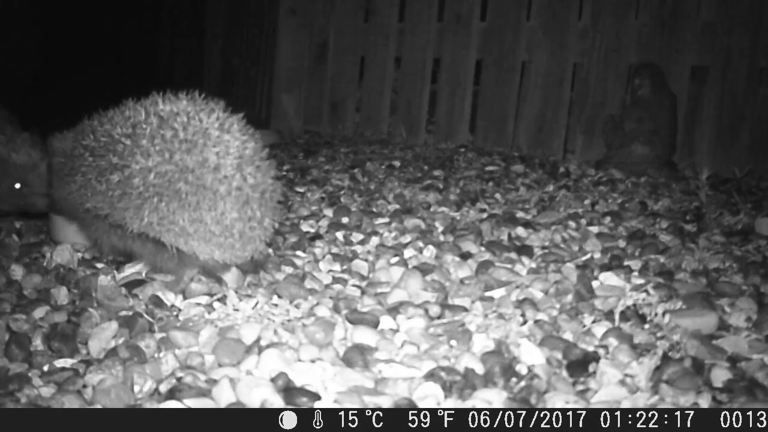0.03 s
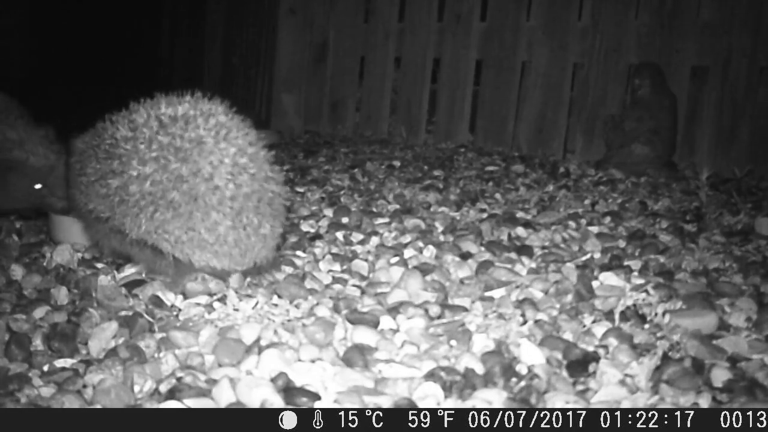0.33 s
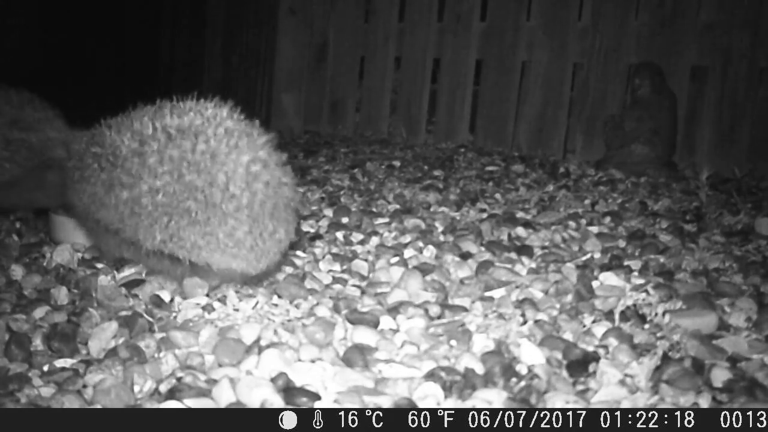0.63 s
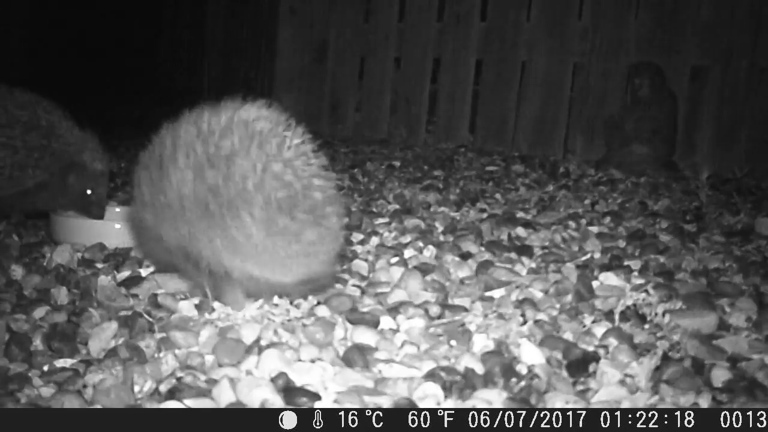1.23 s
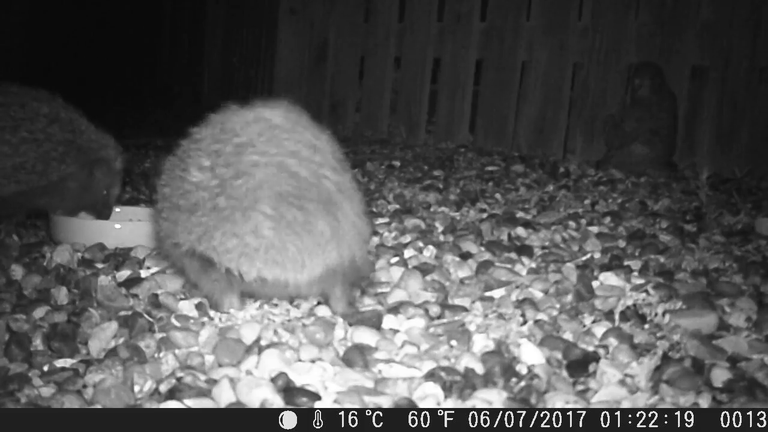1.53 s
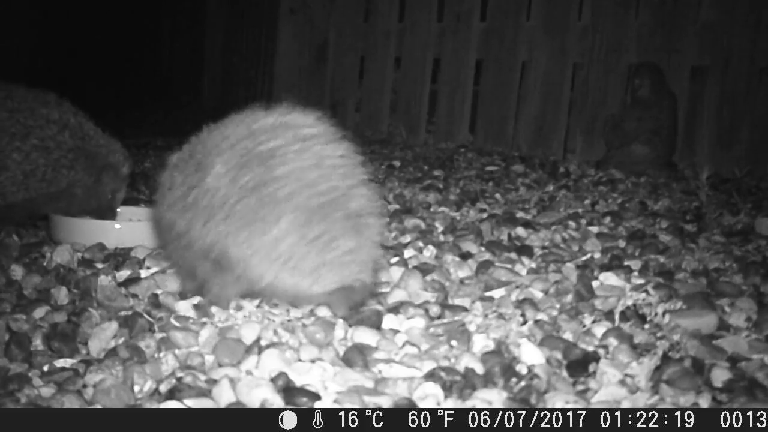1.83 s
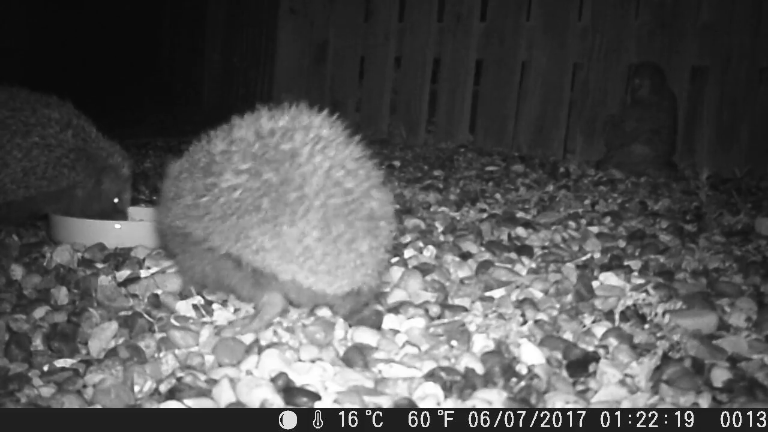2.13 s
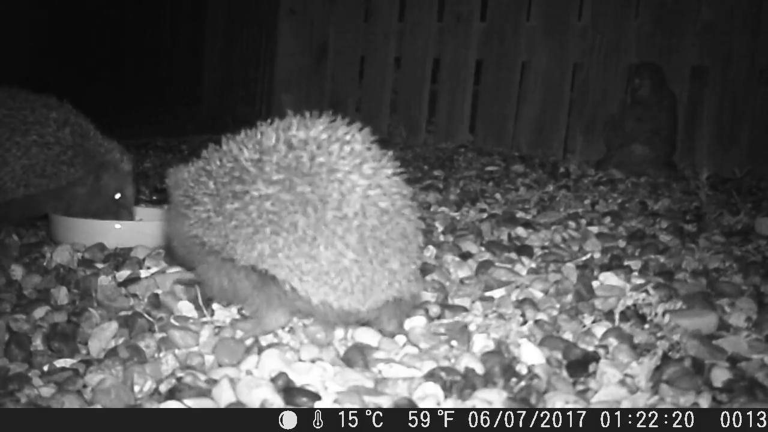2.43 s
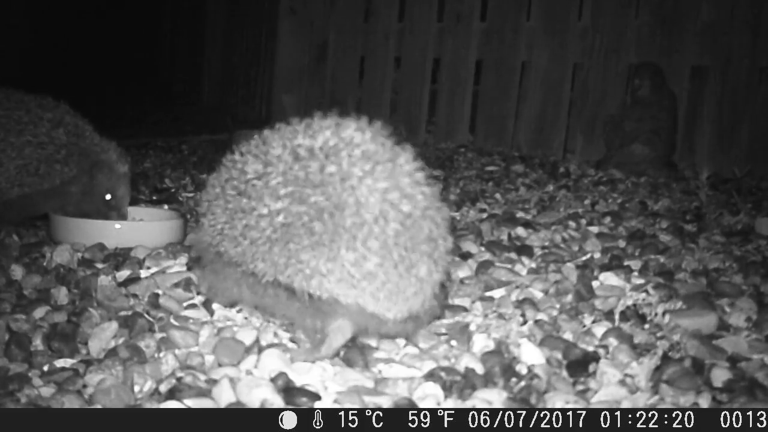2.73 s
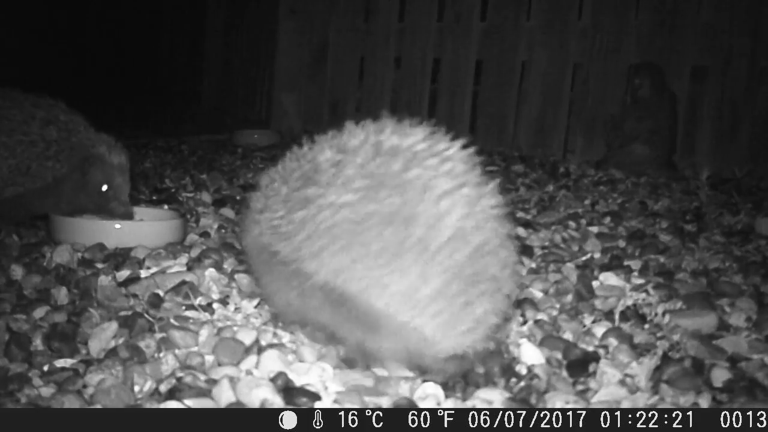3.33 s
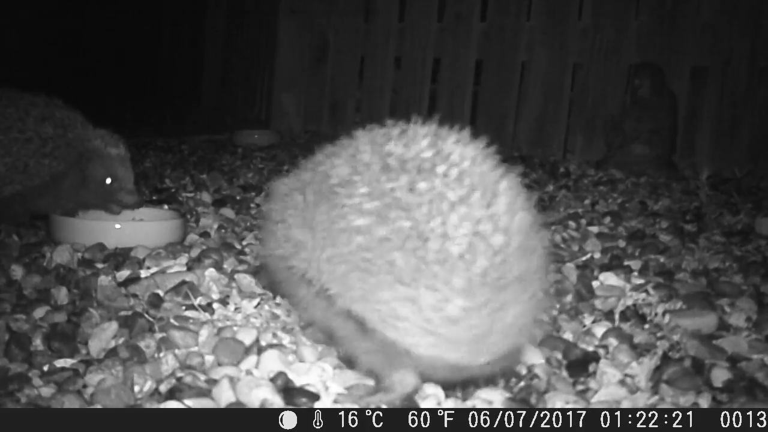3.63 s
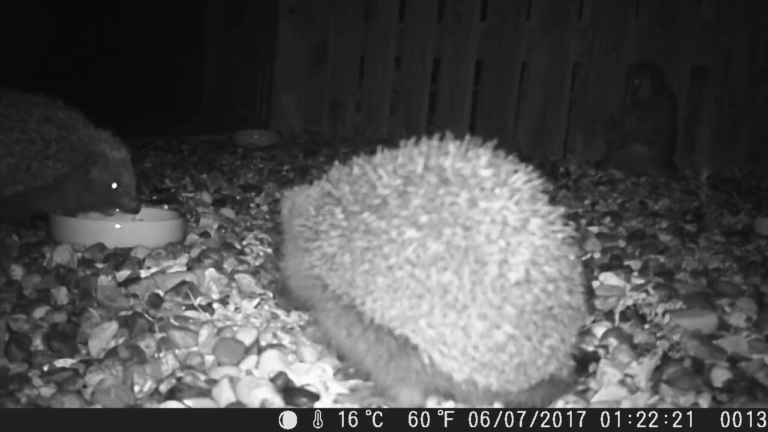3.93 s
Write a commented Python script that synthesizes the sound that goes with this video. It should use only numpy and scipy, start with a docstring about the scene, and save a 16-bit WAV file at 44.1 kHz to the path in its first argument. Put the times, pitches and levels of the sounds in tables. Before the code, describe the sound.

Close to the microphone in a yard at night, a hedgehog puffs air through its snout in a steady, quick rhythm. Soft footsteps, gravel scrapes and small pebble clicks come and go throughout, over a low rumble and faint hiss.

```python
"""A hedgehog huffs about three times a second, shuffling round on the gravel of a yard at night.
It is close to a small outdoor microphone. Each huff is a jet of air through the snout: a hollow rush
with a nasal hiss. Its feet thud softly, drag through the gravel and knock pebbles together.
Ground and fence give faint reflections, and a low night rumble lies behind it all."""
import sys
import numpy as np
from scipy import signal
from scipy.fft import rfft, irfft
from scipy.io import wavfile

SR = 44100
rng = np.random.default_rng(int(sys.argv[2]) if len(sys.argv) > 2 else 0)


def inscribe(sig):
    """Save sig as 16-bit PCM at rate SR to the path in sys.argv[1].

    A 1-D sig is mono; a 2-D sig holds one channel per row.
    Samples are clipped to [-1, 1] before scaling.
    """
    pcm = np.round(np.clip(np.atleast_2d(sig).T, -1, 1) * 32767)
    wavfile.write(sys.argv[1], SR, pcm.astype(np.int16))


N = 176400

# spectrum of gravel, stone on stone: frequency_hz, relative_db
GRAVEL_SPECTRUM = [(500, -28.5), (1100, -10), (1400, -6), (1800, -4.5), (2700, 0), (4000, 0), (5800, 1),
                   (7400, 7.5), (8200, -0.5), (9000, -24)]
# resonances of the stones: centre_hz, width_hz, lift_db
STONE_RESONANCES = [(1420, 210, 4), (2720, 400, 3), (5060, 410, 1), (7400, 630, 4)]
STONE_SPREAD, TREBLE_LIMIT_HZ = 0.14, 8750


def huff(length_s, release_s, rush_db, hiss_db, tilt_db, nostril_hz, dip_hz):
    """A fluttering jet of air swells and dies away in the resonances of the snout."""
    # spectrum of the hollow rush: frequency_hz, relative_db
    rush_spectrum = [(100, -20), (220, -9), (330, 1.5), (450, -1.5), (560, -2), (640, 0.5), (1000, -1),
                     (1130, -6), (1330, -7), (1550, -13.5), (2100, -20.5), (3000, -31), (6000, -44.5)]
    # spectrum of the nasal hiss: frequency_hz, relative_db
    hiss_spectrum = [(1200, -12), (2400, -7.5), (3000, 2.5), (4000, 0), (4700, -5), (5700, -3),
                     (6400, -6.5), (7300, -1), (8000, -5.5), (8800, -21)]
    # resonances of the snout: centre_hz, width_hz, lift_db
    snout_resonances = [(969, 92, 5), (3020, 160, 2.5), (3560, 310, 1), (5570, 400, 2.5), (7200, 1200, 3)]
    rush_rise_s, hiss_rise_s, sag_octaves_per_s = 0.011, 0.012, 1.8
    swell_db, crest_fraction, flutter_db = 7, 0.63, 1.5
    t = np.arange(2 ** 14) / SR
    snout = detuned(snout_resonances, spread=0.025)
    rush = colour(rng.standard_normal(len(t)), rush_spectrum, peaks=snout)
    hiss = colour(rng.standard_normal(len(t)), hiss_spectrum, tilt_db, snout)
    # the nostril resonance and a hollow dip from the ground echo sink as the huff runs out
    sag = 2 ** (-sag_octaves_per_s * np.minimum(t, length_s + release_s))
    hiss = hiss + amp(-0.5) * resonate(hiss, nostril_hz * sag, width_hz=450)
    hiss = unit(hiss - 0.47 * resonate(hiss, dip_hz * sag, width_hz=1100))
    flow = np.exp(-(np.maximum(t - length_s, 0) / release_s) ** 1.34)
    push_db = -swell_db * (np.minimum(t / length_s, 1) / crest_fraction - 1) ** 2
    flutter = amp(flutter_db * band(len(t), 0, width_hz=242))
    rush *= np.minimum(t / rush_rise_s, 1) * amp(rush_db + push_db)
    hiss *= np.minimum(t / hiss_rise_s, 1) * amp(hiss_db + 0.79 * push_db)  # the hiss swells less
    return flow * flutter * (rush + hiss)


def footfall(length_s, level_db):
    """A foot presses dully and unevenly into the gravel bed."""
    # spectrum of the thud: frequency_hz, relative_db
    thud_spectrum = [(100, -8.5), (220, -1), (330, 7), (550, -4.5), (900, -5), (1300, -12.5), (1900, -26.5),
                     (4000, -40.5)]
    attack_s, lumps_db = 0.0041, 2
    t = np.arange(2 ** 12) / SR
    weight = np.minimum(t / attack_s, 1) * np.exp(-2 * (t / length_s) ** 3)
    lumps = unit(amp(lumps_db * band(len(t), 0, width_hz=160)))
    return amp(level_db) * weight * lumps * colour(rng.standard_normal(len(t)), thud_spectrum)


def scuff(length_s, level_db, tilt_db):
    """A dragged foot sets off many tiny slips of stone on stone over a fine grinding."""
    size, slips_per_s, slip_spread_db = 2 ** 13, 830, 4
    t = np.arange(size) / SR
    slips = rng.standard_normal(size) * amp(slip_spread_db * np.minimum(rng.exponential(1, size), 3))
    slips *= rng.random(size) < slips_per_s / SR
    grinding = 0.64 * rng.standard_normal(size)
    stones = detuned(STONE_RESONANCES, STONE_SPREAD)
    grit = colour(unit(slips) + grinding, GRAVEL_SPECTRUM, tilt_db, stones)
    drag = abs(np.sin(np.pi * np.minimum(t / length_s, 1) ** 0.67))  # a rounded stroke, peaking early
    return amp(level_db) * drag * grit


def pebble_knock(level_db, tilt_db):
    """A pebble ticks, rings for an instant and settles."""
    size, lead = 2 ** 11, 2 ** 6
    ring_t60_s, settle_t60_s, settle_db = 0.0068, 0.009, -22.5
    t = np.arange(size) / SR
    decay = amp(-60 * t / ring_t60_s) + amp(settle_db - 60 * t / settle_t60_s)
    lowpass = signal.butter(8, TREBLE_LIMIT_HZ, fs=SR, output="sos")
    ring = signal.sosfilt(lowpass, rng.standard_normal(size) * decay)
    stones = detuned(STONE_RESONANCES, STONE_SPREAD)
    tick = colour(np.roll(ring, lead), GRAVEL_SPECTRUM, tilt_db, stones)[lead:]
    return amp(level_db) * tick * np.sqrt(0.001 * SR / size)  # level as if all its energy fell in 1 ms


def yard_reflections(sound):
    """Faint, short reflections from the ground and the fence."""
    level_db, t60_s, delay_s = -13, 0.13, 0.003
    t = np.arange(SR // 3) / SR
    echoes = rng.standard_normal(len(t)) * (rng.random(len(t)) < 0.05)
    tail = echoes * amp(-60 * t / t60_s) * (t > delay_s)
    return amp(level_db) * signal.fftconvolve(sound, tail / np.linalg.norm(tail))[:N]


def night_rumble():
    """Low rumble thinning into faint hiss, easing slightly, with a wavering hum."""
    # spectrum of the night air: frequency_hz, relative_db
    rumble_spectrum = [(8, -24), (22, 1.5), (38, 0), (50, -5), (90, -11), (130, -9.5), (180, -15.5),
                       (240, -16.5), (400, -19), (500, -22.5), (750, -25.5), (1000, -32), (1500, -37),
                       (2200, -41), (3600, -46), (5200, -54), (7100, -45), (8500, -60)]
    # slow drift of the rumble: time_s, level_db
    rumble_levels = [(0, -52), (1.3, -52), (2.3, -53), (2.8, -53.5), (4, -52.5)]
    # narrow bands of hum: pitch_hz, width_hz, level_db
    hum_bands = [(75.16, 4.5, -63.5), (103.3, 11, -67)]
    hum = sum(amp(level_db) * band(N, hz, width_hz) for hz, width_hz, level_db in hum_bands)
    level = amp(np.interp(np.arange(N) / SR, *np.transpose(rumble_levels)))
    return level * colour(rng.standard_normal(N), rumble_spectrum) + hum


def amp(db):
    """Decibels to gain."""
    return 10 ** (np.asarray(db) / 20)


def unit(x):
    """Scales to rms 1."""
    return x / np.sqrt(np.mean(x ** 2) + 1e-20)


def add(mix, start_s, sound):
    """Mixes a sound in at a time."""
    part = mix[max(round(start_s * SR), 0):][:len(sound)]
    part += sound[:len(part)]


def colour(x, spectrum, tilt_db=0, peaks=()):
    """Shapes a sound by a spectrum, a tilt per octave and resonances; rms 1."""
    hz = np.fft.rfftfreq(len(x), 1 / SR) + 1
    points_hz, points_db = np.transpose(spectrum)
    db = np.interp(np.log(hz), np.log(points_hz), points_db)
    db += tilt_db * np.log2(np.clip(hz, points_hz[0], points_hz[-1]) / points_hz[-1])
    for centre_hz, width_hz, lift_db in peaks:
        db += lift_db / (1 + (2 * (hz - centre_hz) / width_hz) ** 2)
    return unit(irfft(rfft(x) * amp(db), len(x)))


def band(size, centre_hz, width_hz):
    """Noise in one narrow band; at 0 Hz, a random wander."""
    hz = np.fft.rfftfreq(size, 1 / SR)
    bell = np.exp(-2 * ((hz - centre_hz) / width_hz) ** 2)
    return unit(irfft(rfft(rng.standard_normal(size)) * bell, size))


def resonate(x, hz, width_hz):
    """A resonance of gain 1 that follows the curve hz."""
    turn = np.exp(2j * np.pi * np.cumsum(hz) / SR)
    pole = np.exp(-np.pi * width_hz / SR)
    return 2 * (turn * signal.lfilter([1 - pole], [1, -pole], x / turn)).real


def detuned(peaks, spread):
    """Moves each resonance at random by a small fraction of its frequency."""
    return [(hz * (1 + spread * rng.uniform(-1.2, 1)), width, db) for hz, width, db in peaks]


def scene():
    """The hedgehog's huffs and footwork close by, the yard and the night behind; mono."""
    # breaths: start_s, length_s, release_s, rush_db, hiss_db, hiss_tilt_db_per_octave, nostril_hz, dip_hz
    huffs = [(0.105, 0.079, 0.011, -51, -60.5, 0.5, 3500, 2750),
             (0.4, 0.096, 0.0093, -50, -60.5, -2.5, 5000, 2500),
             (0.703, 0.091, 0.026, -50, -59, 2.5, 3100, 5500),
             (1.073, 0.089, 0.021, -49.5, -57.5, -0.5, 2580, 3510),
             (1.366, 0.064, 0.048, -52, -63, 2.5, 4100, 5300),
             (1.726, 0.056, 0.054, -50, -63, -.5, 5100, 4900),
             (2.069, 0.077, 0.031, -51, -61.5, 3, 3950, 7160),
             (2.48, 0.076, 0.059, -47.5, -58, 2.6, 3900, 6500),
             (2.823, 0.083, .038, -49.5, -62.5, 6, 3980, 4960),
             (3.217, 0.075, 0.052, -50, -62, 0.5, 2900, 4060),
             (3.538, 0.076, 0.037, -50.5, -64, 2.5, 3700, 3100),
             (3.980, 0.076, .03, -50.5, -60.5, 6, 4030, 5260)]
    # soft steps: start_s, length_s, level_db
    footfalls = [(0.075, 0.018, -61), (0.235, 0.018, -57), (.325, 0.05, -61.5), (0.585, 0.028, -66),
                 (0.634, 0.011, -52), (0.669, 0.064, -55.5), (.965, .02, -55), (1.058, 0.06, -54),
                 (1.249, 0.026, -58), (1.5, .035, -56.5), (1.571, 0.044, -68), (1.64, 0.019, -57),
                 (1.875, 0.033, -55), (2.18, 0.01, -61), (2.389, 0.026, -55), (2.438, 0.047, -51.5),
                 (2.573, 0.063, -56.5), (2.675, 0.035, -47), (3.002, .04, -71), (3.094, 0.023, -49.5),
                 (3.128, 0.017, -56), (3.329, 0.031, -50), (3.463, .024, -53.5), (3.70, 0.027, -59),
                 (3.753, 0.055, -52.5), (3.842, 0.028, -56.5)]
    # feet dragged through gravel: start_s, length_s, level_db, tilt_db_per_octave
    scuffs = [(0.516, 0.039, -54, -4.5), (0.548, 0.019, -53.5, -1), (0.577, 0.1, -73, -3),
              (.803, .015, -49.5, -5), (0.831, .012, -58.5, -5), (.853, 0.019, -53.5, -6.5),
              (0.877, 0.031, -64.5, -6), (0.901, 0.021, -57, -5.5), (0.918, 0.035, -74, -2),
              (0.957, 0.066, -75, -3), (1.19, 0.027, -52.5, -3.5), (1.254, 0.063, -75, -5),
              (1.479, 0.056, -68, -6), (1.655, 0.012, -66.5, -8), (1.808, 0.049, -58, -1),
              (1.843, 0.07, -62, -6), (1.906, 0.083, -75.5, -4), (2.15, 0.032, -72, -1),
              (2.187, 0.058, -59.5, -4), (2.238, 0.052, -75, 2), (2.384, 0.019, -59, -11),
              (2.439, 0.039, -71.5, -6.5), (2.603, 0.055, -59, -16), (2.99, 0.051, -64, -5.5),
              (3.018, 0.071, -68.5, -2), (3.351, .022, -61, -5.5), (3.656, 0.023, -64, -7.5),
              (3.712, 0.043, -64.5, -9)]
    # pebbles knocking together: start_s, level_db, tilt_db_per_octave
    knocks = [(0.2292, -60.5, -5), (0.528, -48, -6.5), (0.5292, -46.5, -9), (0.5422, -41.5, 2),
              (0.5451, -40, 2), (.5579, -46, -3), (0.8046, -45, 12), (0.827, -35.5, 16), (0.8338, -38, 25),
              (.8633, -41.5, 14), (.867, -44.5, 14), (.8888, -45, 0.5), (0.9095, -51, 3), (.9293, -51, 2),
              (1.0022, -53.5, -8), (1.021, -52, -6), (1.2067, -48.5, -7.5), (1.21, -49.5, 5),
              (1.323, -63, -1.5), (1.50, -54, 8), (1.561, -62, -8.5), (1.603, -59.5, 15),
              (1.8132, -49.5, -5), (1.8357, -41, 4), (1.881, -53.5, 4), (1.919, -57.5, -1),
              (1.9757, -55, -3.5), (2.1584, -51, 18), (2.1944, -42.5, -4), (2.1989, -51.5, -13),
              (2.2148, -47, -3), (2.2287, -41.5, -4.5), (2.264, -59, -3), (2.3, -57.5, -6),
              (2.387, -45.5, 2.5), (2.604, -53, -2), (2.65, -55, -4), (2.7272, -56, -9.5), (3.024, -55, -1),
              (3.0368, -52, 9), (3.044, -53, 1), (3.056, -45, 0.5), (3.677, -53.5, -7.5)]
    hedgehog = np.zeros(N)
    for source, events in ((huff, huffs), (footfall, footfalls), (scuff, scuffs), (pebble_knock, knocks)):
        for start_s, *settings in events:
            add(hedgehog, start_s, source(*settings))
    return (hedgehog + yard_reflections(hedgehog) + night_rumble())[None]


def record(dry):
    """The small outdoor microphone has two narrow notches and a steep treble limit."""
    # the microphone's dead spots: centre_hz, width_hz
    notches = [(3200, 210), (6400, 330)]
    for centre_hz, width_hz in notches:
        dry = signal.lfilter(*signal.iirnotch(centre_hz, centre_hz / width_hz, SR), dry)
    lowpass = signal.firwin(201, TREBLE_LIMIT_HZ, window=("kaiser", 8), fs=SR)
    return signal.oaconvolve(dry, lowpass[None], "same")


dry = scene()
out = record(dry)
inscribe(out)
```